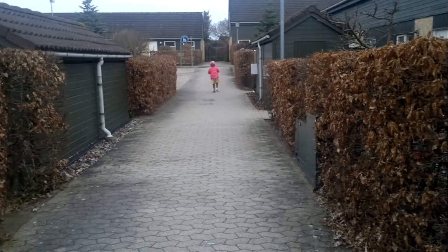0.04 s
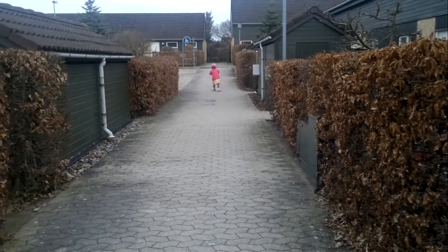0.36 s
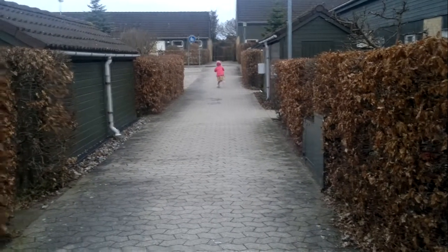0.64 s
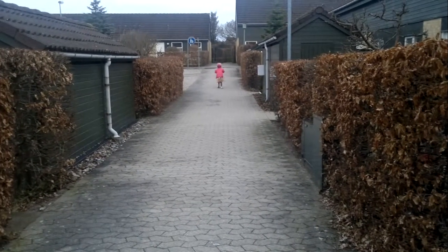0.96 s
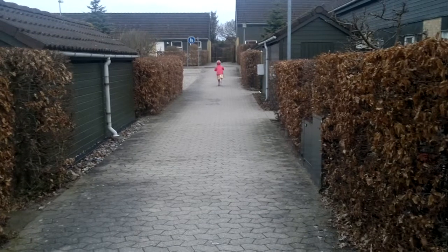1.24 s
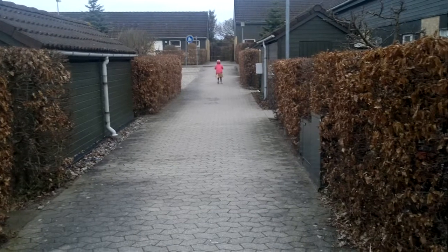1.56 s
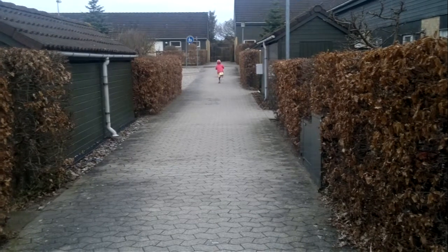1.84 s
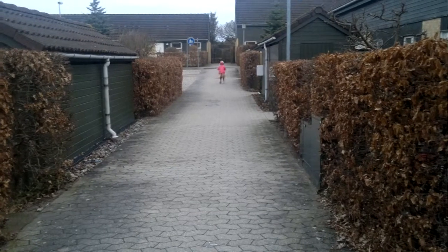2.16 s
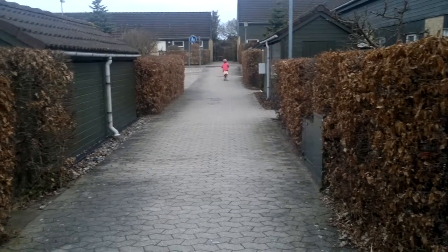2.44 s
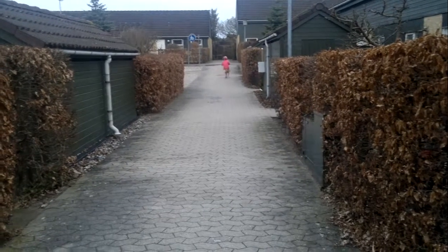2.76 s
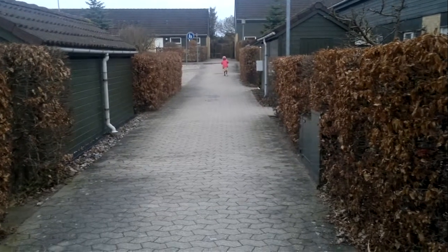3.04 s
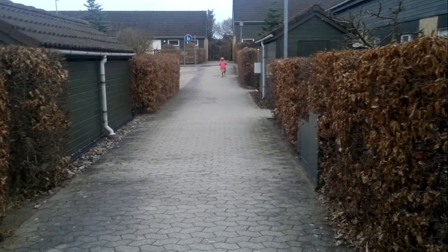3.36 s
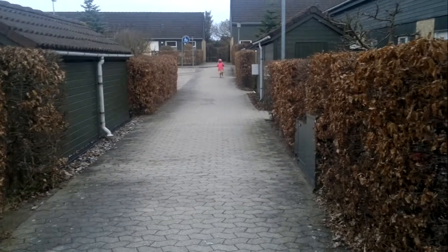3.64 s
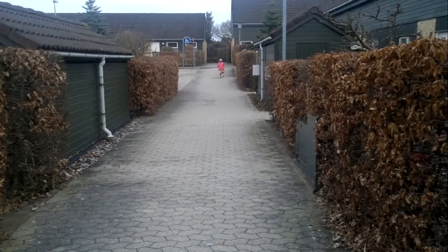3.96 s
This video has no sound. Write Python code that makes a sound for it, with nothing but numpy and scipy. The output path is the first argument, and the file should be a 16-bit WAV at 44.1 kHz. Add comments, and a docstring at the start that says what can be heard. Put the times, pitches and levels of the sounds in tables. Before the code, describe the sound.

A small scooter rumbles faintly and unevenly over paving ahead, fading after about 2.4 seconds. Soft, gritty footsteps land near 0.9, 1.6 and 2.3 seconds. Tiny handling ticks and creaks run throughout, while a jacket swishes on the left, snapping around 1.6 and 3 seconds. Wind thumps the microphone at 2.2 seconds and hardest near 3.9. A soft outdoor hiss and very faint high whine lie underneath.

```python
"""A low, uneven rumble: a small scooter rolls far ahead on a paved lane between hedges.
Someone follows on foot with a camera. Their soles thud softly and scrape on grit, their jacket
swishes by the left microphone, and tiny ticks ring out, probably the case creaking in the hand.
Gusts of wind thump the two microphones, hardest at the end. Under it all lie a soft hiss of
outdoor air and the camera's faint electrical whine."""
import sys
import numpy as np
from scipy import signal
from scipy.fft import rfft, irfft
from scipy.io import wavfile
from scipy.ndimage import uniform_filter1d

SR = 44100
rng = np.random.default_rng(int(sys.argv[2]) if len(sys.argv) > 2 else 0)


def waveform_to_disk(signal):
    """Save audio, clipped to [-1, 1], as 16-bit WAV at the path in sys.argv[1]."""
    frames = np.transpose(np.atleast_2d(signal))
    scaled = np.clip(frames, -1, 1) * 32767
    samples = np.round(scaled).astype(np.int16)
    wavfile.write(sys.argv[1], SR, samples)


N = 176400
T = np.arange(N) / SR


def amp(db):
    """Turns decibels into a number to multiply by."""
    return 10 ** (np.asarray(db) / 20)


def unit(x):
    """Scales a signal to an average strength (rms) of one."""
    return x / np.sqrt(np.mean(x ** 2) + 1e-20)


def curve(points):
    """Joins (time [s], value) points with straight lines."""
    return np.interp(T, *np.transpose(points))


def colour(x, points):
    """Turns lows and highs up or down, following (frequency [Hz], level [dB]) points."""
    hz, db = np.transpose(points)
    bins_hz = np.fft.rfftfreq(N, 1 / SR)
    gain = amp(np.interp(np.log(bins_hz + 1), np.log(hz + 1), db))
    return irfft(rfft(x) * gain, N)


def pan(db):
    """Left and right gains that make the left side louder by db."""
    return amp(np.array([[.5], [-.5]]) * db)


def stereo_noise(alike):
    """White noise for both sides: alike is 1 for the same, 0 for unrelated, -1 for opposite."""
    left, other = rng.standard_normal((2, N))
    return np.array([left, alike * left + np.sqrt(1 - alike ** 2) * other])


def steady(x, span_s):
    """Evens out loudness over a span of time, keeping the finer grain."""
    size = int(span_s * SR)
    power = uniform_filter1d(uniform_filter1d(x ** 2, size), size)
    return x / np.sqrt(abs(power) + 1e-4 * np.mean(x ** 2))


def swell(middle, half_s, db, flatness=2.42):
    """A smooth rise and fall: a bell at flatness 2, flatter on top above that."""
    return amp(db) * np.exp(-.5 * np.minimum(abs(T - middle) / half_s, 20) ** flatness)


def hit(start, decay_s, db, rise_s=0.00028):
    """A quick rise that then dies away."""
    age = np.maximum(T - start, 0)
    return amp(db) * np.minimum(age / rise_s, 1) * np.exp(-np.maximum(age - rise_s, 0) / decay_s)


def grains(per_s, scatter_db):
    """Random clicks of uneven size."""
    size = amp(scatter_db * np.clip(rng.standard_normal(N), -2, 2))
    return size * rng.choice([-1, 1], N) * (rng.random(N) < per_s / SR)


def patchy(x, patch_db, flutter_db):
    """Lets the tone and loudness of a rubbing noise wander from moment to moment."""
    spectra = signal.stft(x, nperseg=256)[2]
    patches = uniform_filter1d(rng.standard_normal(spectra.shape), size=2, axis=0)
    patches = unit(uniform_filter1d(patches, size=5, axis=1))
    flutter = unit(uniform_filter1d(rng.standard_normal(spectra.shape[1]), size=3))
    gain = amp(patch_db * np.clip(patches, -2, 2) + flutter_db * np.clip(flutter, -2, 2))
    return unit(signal.istft(spectra * gain, nperseg=256)[1][:N])


def add(mix, middle, sound):
    """Mixes in a short sound centred on a time."""
    part = mix[:, round(middle * SR) - sound.shape[1] // 2:][:, :sound.shape[1]]
    part += sound[:, :part.shape[1]]


def from_left(x, lag_s=0.00015):
    """Sound from the left reaches the right microphone a moment later."""
    return np.array([x[0], np.interp(T - lag_s, T, x[1])])


# tone of the background hiss (frequency [Hz], level [dB])
AIR_TONE = [(15, -2), (40, -1.5), (90, -7), (200, -18.5), (400, -20.5), (800, -22.5), (1600, -29),
            (3000, -32.5), (4500, -35), (6800, -38), (8400, -37.5), (11000, -41), (15500, -47)]
def air():
    """Still outdoor air and the microphones make a soft, steady hiss."""
    return amp(-62.5) * unit(colour(stereo_noise(alike=0.17), AIR_TONE))


# tone of the whine (frequency [Hz], level [dB])
WHINE_TONE = [(7300, -110), (8000, -98.5), (8250, -97), (8500, -97.5), (8900, -106), (10200, -109)]
# when the whine is louder (start [s], end [s])
WHINE_SPELLS = [(.27, 0.58), (.95, 1.3), (2.03, 2.85), (3.05, 3.35)]
def whine(pulse_hz=216.67, swing_db=7):
    """The camera's electronics pulse, giving thin, high overtones that grow and fade."""
    overtones = pulse_hz * np.arange(1, 48)
    gains = amp(np.interp(overtones, *np.transpose(WHINE_TONE), left=-np.inf))
    tones = sum(gain * np.cos(2 * np.pi * (hz * T + rng.random()))
                for hz, gain in zip(overtones, gains) if gain > 0)
    spells = sum(1. * (T > start) * (T < end) for start, end in WHINE_SPELLS)
    louder = uniform_filter1d(spells, size=1000)
    return np.sqrt(2) * tones * amp(swing_db * (louder - 0.5))


# gusts (middle [s], half length [s], level [dB], pitch [times the usual], side [0 left, 1 right])
GUSTS = [(0.041, 0.021, -48, 1.35, 1), (0.473, 0.015, -41, 0.93, 1), (.905, 0.02, -50.5, 0.77, 1),
         (1.936, 0.014, -39.5, 1.18, 1), (2.183, 0.028, -28, 1.21, 1), (2.657, 0.057, -56, 0.98, 0),
         (3.807, 0.088, -46.5, 1.67, 0), (3.898, 0.059, -30, 1.3, 0), (3.963, 0.015, -22, 0.89, 0),
         (3.892, 0.031, -25.5, 0.96, 1), (3.972, 0.021, -26, 0.992, 1)]
# usual tone of a gust (frequency [Hz], level [dB])
GUST_TONE = [(8, -1), (26, 8.5), (40, 3), (62, -12), (90, -17), (140, -29), (250, -37.5), (500, -50),
             (1700, -79)]
def wind():
    """Swirls of air thump each microphone separately, each at its own low pitch."""
    sides = np.zeros((2, N))
    for middle, half_s, db, pitch, side in GUSTS:
        swirl = colour(rng.standard_normal(N), [(hz * pitch, level) for hz, level in GUST_TONE])
        sides[int(side)] += swell(middle, half_s, db, flatness=2.94) * steady(swirl, span_s=0.051)
    return sides


# jacket swishes (middle [s], half length [s], swish level [dB], sizzle level [dB])
JACKET_SWISHES = [(0.136, 0.055, -64, -98), (0.284, 0.058, -68.5, -74), (0.51, 0.033, -65, -73),
                  (0.67, 0.071, -70, -81), (0.973, 0.012, -62.5, -75), (1.142, 0.081, -72.5, -68.5),
                  (1.214, 0.017, -58, -57.5), (1.39, 0.035, -67.5, -71), (1.481, 0.033, -62, -71),
                  (1.573, 0.031, -56, -56), (1.609, 0.03, -55.5, -70), (1.663, 0.019, -59, -56),
                  (1.794, 0.015, -64, -72), (1.945, 0.013, -65, -76), (2.39, 0.023, -54.5, -82),
                  (2.449, 0.028, -71, -69.5), (2.553, 0.032, -75, -72.5), (2.652, 0.015, -61.5, -66.5),
                  (2.764, 0.01, -65, -72), (3.021, 0.018, -53.5, -63), (3.264, 0.02, -66, -72.5),
                  (3.518, 0.017, -56.5, -69.5), (3.617, 0.016, -55.5, -60.5), (3.705, 0.018, -60, -69.5),
                  (3.834, 0.0082, -57, -70), (3.884, 0.025, -54, -64.5), (4.015, 0.031, -48.5, -81)]
# jacket snaps (time [s], level [dB])
JACKET_SNAPS = [(1.567, -59), (1.587, -45), (3.002, -40.5), (3.015, -47)]
# tones of a swish, its higher sizzle and a snap (frequency [Hz], level [dB])
SWISH_TONE = [(200, -30), (700, -14.5), (1300, -3.5), (1650, -13.5), (2000, -1), (2700, -3), (3000, 2.5),
              (3190, 8), (3400, -8.5), (3700, -2.5), (4300, -10.5), (4550, -15), (6000, -18), (9000, -18.5),
              (15000, -70)]
SIZZLE_TONE = [(3500, -18), (4650, -9.5), (5020, 1.5), (5300, 7.5), (5750, -25), (9500, -24), (15000, -72)]
SNAP_TONE = [(1500, -19), (2100, -3), (3200, -3), (3900, -1.5), (4650, -19), (5250, -2.5), (5900, -38),
             (15000, -63)]
# how the jacket's sound changes at the right microphone (frequency [Hz], gain [dB])
FAR_SIDE_TONE = [(300, -41), (1300, -9), (2200, -2.5), (3100, -11.5), (4000, -44), (5300, -32), (7000, -50),
                 (14000, 14)]
def jacket(snap_s=0.011):
    """Cloth rubs in short, grainy swishes by the left microphone, and snaps when it pulls tight."""
    def fibres(tone):
        return colour(grains(per_s=5000, scatter_db=3.5), tone)

    def rub(tone, patch_db):
        return steady(patchy(fibres(tone), patch_db, flutter_db=4), span_s=0.067)

    swish = np.sqrt(sum(swell(time, half_s, db) ** 2 for time, half_s, db, _ in JACKET_SWISHES))
    sizzle = np.sqrt(sum(swell(time, half_s, db) ** 2 for time, half_s, _, db in JACKET_SWISHES))
    snap = sum(hit(time, snap_s, db) for time, db in JACKET_SNAPS)
    left, right = (swish * rub(SWISH_TONE, patch_db=3.5)
                   + sizzle * rub(SIZZLE_TONE, patch_db=5.5)
                   + snap * steady(fibres(SNAP_TONE), snap_s) for _ in range(2))
    return np.array([left, colour(right, FAR_SIDE_TONE)])


def tick(hz, lag_rad, width_s):
    """One short ring of the case; its wave runs a little behind on the right."""
    t = np.arange(-700, 701) / SR
    bell = np.exp(-.5 * (t / width_s) ** 2)
    return bell * np.cos(2 * np.pi * hz * t - np.array([[0], [lag_rad]]))


# how the creaking rises and falls (time [s], level [dB])
CREAK_LEVELS = [(0.0, -52), (0.07, -72.5), (0.11, -55), (0.13, -65.5), (0.24, -50.5), (0.34, -60),
                (0.37, -52), (0.44, -66), (0.56, -45.5), (0.65, -50), (0.68, -64), (0.75, -54), (0.79, -86),
                (0.83, -58.5), (0.98, -64.5), (1.01, -67.5), (1.09, -54), (1.12, -61), (1.15, -49),
                (1.26, -56.5), (1.28, -68.5), (1.35, -46.5), (1.39, -55), (1.6, -54), (1.83, -63.5),
                (1.87, -57.5), (1.99, -74), (2.03, -52.5), (2.05, -65.5), (2.14, -69.5), (2.16, -58.5),
                (2.24, -74.5), (2.29, -54), (2.35, -60.5), (2.67, -56), (2.7, -64), (2.8, -59.5),
                (2.84, -59), (2.85, -90), (2.88, -76), (2.92, -71), (3.0, -52.5), (3.23, -67.5),
                (3.27, -48), (3.3, -64), (3.32, -55.5), (3.39, -69), (3.41, -52), (3.43, -94),
                (3.46, -48.5), (3.49, -66.5), (3.65, -63.5), (3.71, -54), (3.78, -78.5), (3.81, -58.5),
                (4.0, -54)]
# how far to the left the creaking sits (time [s], left minus right [dB])
CREAK_SIDE = [(0, 1), (.6, 1.5), (1.2, 2.5), (1.7, 7), (2.3, 5), (2.7, 8), (3.05, 4), (3.5, 9), (4, 6.5)]
# the sharpest ticks (time [s], level [dB])
SHARP_TICKS = [(0.09, -53.5), (0.203, -46), (0.537, -43), (0.546, -39), (0.562, -38.5), (.572, -48),
               (.5825, -48), (0.598, -49), (0.615, -46), (0.6352, -44.5), (1.3286, -49), (1.352, -44.5),
               (1.378, -43), (1.427, -44.5), (1.4467, -46), (1.675, -45.5), (1.719, -48.5), (1.772, -53),
               (2.024, -49.5), (2.16, -50), (2.448, -43.5), (2.483, -49), (2.496, -50), (2.631, -48),
               (2.79, -46), (3.061, -47), (3.102, -52), (3.317, -48), (3.364, -51), (3.412, -50),
               (3.469, -53)]
# short dry rubs, and one brief scuff as a foot lands (middle [s], half length [s], level [dB])
DRY_RUBS = [(0.23, 0.056, -72), (0.929, 0.0026, -53.5), (1.205, 0.0065, -59), (2.307, 0.024, -62),
            (2.791, 0.035, -65.5), (2.888, 0.013, -64), (3.029, 0.073, -62.5)]
# tone of the dry rubbing (frequency [Hz], level [dB])
RUB_TONE = [(600, -16), (1300, -9), (1650, -13), (1950, -0.5), (2250, 5), (2650, 5), (2900, -18),
            (3300, -16), (4500, -16.5), (8000, -30.5)]
def case_creak(ring_hz=2425, spread_hz=74, lag_rad=2.256, ticks_per_s=240, stick_s=0.011, stick_db=-5.5):
    """Tiny slips of the hand ring the case over a dry rubbing; the grip sticks around each sharp tick."""
    count = 16
    pitches = ring_hz + spread_hz * np.sqrt(3) * np.linspace(-1, 1, count)
    lags = lag_rad + 0.078 * rng.standard_normal(count)
    creak = np.zeros((2, N))
    for hz, lag in zip(pitches, lags):
        slips = grains(ticks_per_s / count, scatter_db=2.5)
        creak += [signal.oaconvolve(slips, side, "same") for side in tick(hz, lag, width_s=0.0019)]
    sharp, stuck = np.zeros((2, N)), np.zeros(N)
    for time, db in SHARP_TICKS:
        hz = ring_hz + 55 * rng.standard_normal()
        add(sharp, time, amp(db) * tick(hz, lag_rad, width_s=0.0013))
        distance = abs(T - time + stick_s / 2) / stick_s  # zero just before the tick
        stuck = np.maximum(stuck, 1 - distance ** 2)
    strength = amp(curve(CREAK_LEVELS) - 3.5 + stick_db * stuck)
    rub_strength = amp(-7.5) * strength + sum(swell(*rub) for rub in DRY_RUBS)
    rubbing = rub_strength * unit(colour(stereo_noise(alike=-0.32), RUB_TONE))
    return (strength * steady(creak, span_s=0.047) + rubbing + sharp) * pan(curve(CREAK_SIDE))


# steps and scuffs (time [s], sole level [dB], sole fade [s], thud [dB], grit [dB], heel crack [dB])
FOOTFALLS = [(0.27, -62, 0.021, -80, -83, -62), (0.767, -55, 0.0078, -59, -73, -74),
             (0.924, -53, 0.024, -49.5, -61, -62), (0.941, -54.5, 0.0062, -49.5, -86, -79),
             (1.075, -55, 0.0072, -59, -68, -70), (1.6, -54, 0.012, -69, -61.5, -82),
             (2.291, -49.5, 0.015, -57, -57.5, -55), (3.002, -69, 0.026, -65, -61, -84),
             (3.57, -67, 0.12, -70, -71, -78)]
# tones of the sole, its thud and the grit under it (frequency [Hz], level [dB])
SOLE_TONE = [(100, -15), (250, 3), (370, 8.5), (680, 19), (1100, 11.5), (1500, 2), (2100, 12), (2900, -28),
             (15000, -56)]
THUD_TONE = [(30, -12), (120, -33), (180, 14.5), (230, 11), (300, 15), (430, -8), (900, -37), (4000, -51)]
GRIT_TONE = [(150, -28), (600, 6.5), (1600, 2.5), (2300, 4), (3700, 0.5), (5400, -5), (7000, -9),
             (9500, -10.5), (15000, -33)]
def footsteps(thud_s=0.0098, scrape_s=0.015, scrape_lead_s=0.01495, crack_s=0.0082):
    """Grit scrapes under the shoe, then the heel cracks down and the sole lands with a soft thud."""
    sole, thud, scrape, crack = np.zeros((4, N))
    for time, sole_db, sole_s, thud_db, grit_db, crack_db in FOOTFALLS:
        sole += hit(time, sole_s, sole_db)
        thud += hit(time, thud_s, thud_db)
        scrape += hit(time - scrape_lead_s, scrape_s, grit_db)
        crack += hit(time, crack_s, crack_db)
    sole_noise = steady(colour(stereo_noise(alike=0.69), SOLE_TONE), span_s=0.012)
    thud_noise = steady(colour(stereo_noise(alike=0.82), THUD_TONE), span_s=0.026)
    sand = np.array([grains(per_s=4100, scatter_db=4.5) for _ in range(2)])
    grit_noise = steady(colour(sand, GRIT_TONE), span_s=0.014)
    landing = (sole * sole_noise + thud * thud_noise) * pan(db=2)
    crunch = (scrape + crack) * grit_noise * pan(db=17)
    return landing + crunch


# how the rumble rises and falls (time [s], level [dB])
RUMBLE_LEVELS = [(0.0, -66.5), (0.35, -62.5), (0.88, -70.5), (0.94, -74), (0.98, -72), (1.1, -60.5),
                 (1.43, -65), (1.63, -58.5), (1.72, -70.5), (1.95, -60.5), (1.97, -73.5), (2.21, -59.5),
                 (2.26, -65.5), (2.3, -56), (2.4, -66.5), (3.75, -75.5)]
# tone of the rumble (frequency [Hz], level [dB])
RUMBLE_TONE = [(20, -2), (70, -1.5), (120, 4.5), (162, 1.5), (180, 8.5), (202, 2.5), (260, 2), (350, -10),
               (480, -19), (680, -16), (1200, -25), (2000, -46), (4000, -37), (16000, -35)]
def scooter():
    """Small wheels rumble over paving stones, far ahead and a little to the left."""
    rumble = unit(colour(stereo_noise(alike=1), RUMBLE_TONE))
    return rumble * amp(curve(RUMBLE_LEVELS) - 1.5) * pan(db=4)


def scene():
    """Adds up everything heard at the two microphones."""
    return air() + whine() + from_left(scooter() + footsteps()) + case_creak() + jacket() + wind()


def record(dry):
    """The camera cuts off the very highest treble."""
    low_pass = signal.firwin(511, cutoff=15700, window=("kaiser", 9), fs=SR)
    return signal.oaconvolve(dry, low_pass[None], "same")


dry = scene()
out = record(dry)
waveform_to_disk(out)
```